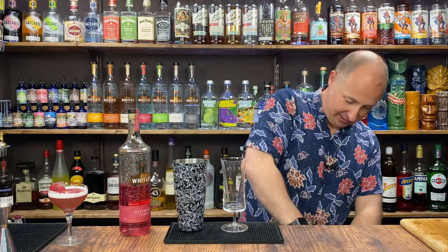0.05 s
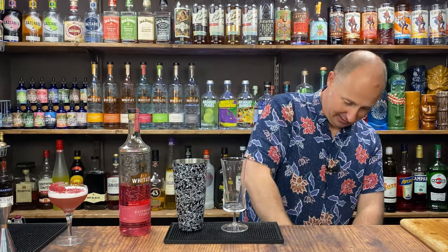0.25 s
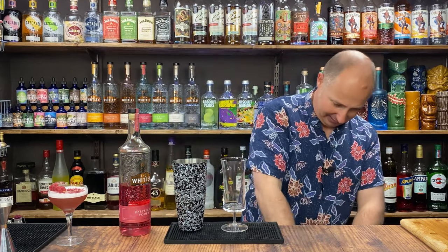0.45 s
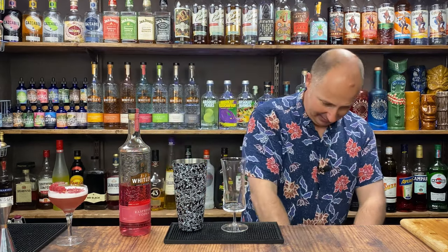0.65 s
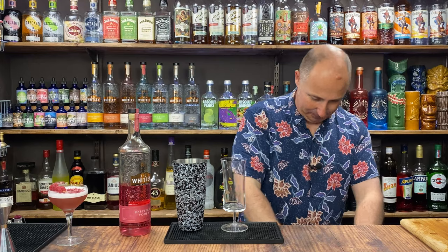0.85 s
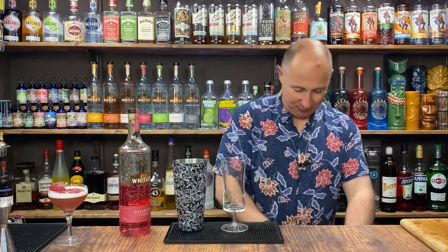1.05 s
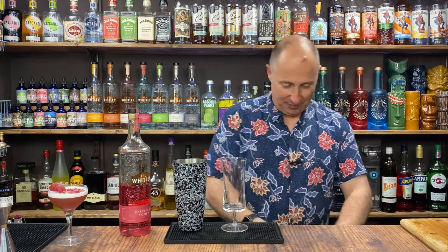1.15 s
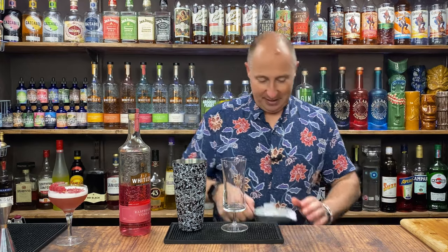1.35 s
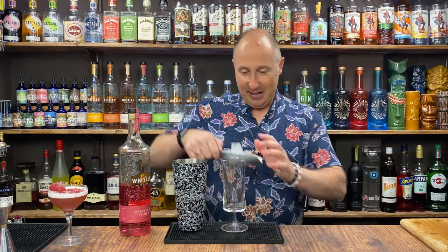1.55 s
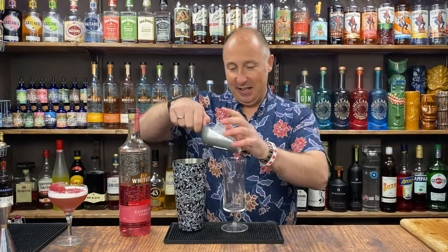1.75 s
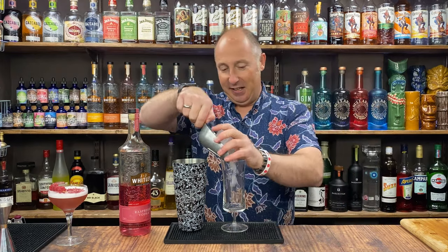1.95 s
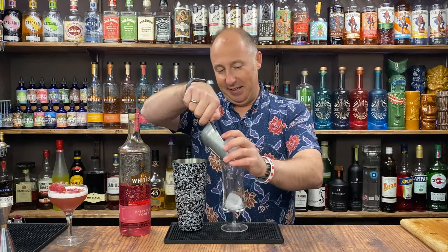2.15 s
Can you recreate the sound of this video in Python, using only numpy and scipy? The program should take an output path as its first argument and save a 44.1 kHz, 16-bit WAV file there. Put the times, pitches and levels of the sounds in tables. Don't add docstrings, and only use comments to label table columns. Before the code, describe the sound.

Ice rattles loudly as a metal scoop digs in a bin, then cubes clink in a glass

```python
import sys
import numpy as np
from scipy import signal
from scipy.fft import rfft, irfft
from scipy.io import wavfile
from scipy.ndimage import uniform_filter1d

SR = 44100
rng = np.random.default_rng(int(sys.argv[2]) if len(sys.argv) > 2 else 0)


def wav_record(signal):
    frames = np.transpose(np.atleast_2d(signal))
    bounded = np.clip(frames, -1, 1)
    quanta = np.round(bounded * 32767).astype(np.int16)
    wavfile.write(sys.argv[1], SR, quanta)


def volts_from_db(level):
    exponent = np.asarray(level, float) / 20
    return 10 ** exponent


N = 96931

# frequency [Hz], level [dB per Hz].
HUSH_SPECTRUM = [(25, -22), (60, -4), (125, -3), (310, 0), (800, -8), (4000, -14), (8000, -16),
                 (16000, -22)]
HUSH_DB = -72
HUM_HZ, HUM_WIDTH_HZ, HUM_DB = 57, 7, -72
ROOM_T60_S, ROOM_DB = 0.35, -21
SOFT_S = 0.00036

# start [s], low ring [dB], high ring [dB], air [dB], cube clack [dB].
GLASS_TAPS = [(1.929, -34.5, -38.5, -43, -35), (1.935, -37, -41, -49, -52), (1.943, -46, -45.5, -44, -34),
              (1.97, -52, -48, -53.5, -58), (1.992, -30.5, -30.5, -30, -23),
              (2.003, -29.5, -30.5, -38, -54), (2.024, -41, -39, -40, -39), (2.101, -67, -49, -50, -54),
              (2.126, -51, -44, -49, -48), (2.135, -38.5, -33.5, -25.5, -16.5),
              (2.154, -41.5, -35.5, -66, -55), (2.181, -49, -44.5, -41.5, -38)]
# falls from [s], air column [Hz], cube pitch [Hz].
DROPPED_CUBES = [
    (1.9, 559, 1480),
    (1.98, 522, 1392),
    (2.09, 580, 1477),
]
# frequency [Hz], level [dB], T60 [s].
WALL_LOW_MODES = [(1843, 7.5, 0.17), (1760, -32, 0.17), (2300, -12.5, 0.24)]
# frequency [Hz], level under first, second, third cube [dB],
# T60 [s].
WALL_HIGH_MODES = [(3210, -16, -15, -25.5, 0.32), (4359, -7.5, -8, -11, 0.17), (4716, -30, -34, -11, 0.16),
                   (5000, -15, -10, -19, 0.071), (5630, -5, -0.5, -17, 0.046), (7200, -5, 2.5, -2, 0.035),
                   (7910, -0.5, 2.5, -3, 0.081), (8250, -1, -4, -11, .05), (9300, -11, -1, 1, 0.02),
                   (9530, -10, -6, -8, 0.34), (9640, -13, -12, -12, 0.08), (10300, -7, -3, -6, 0.05),
                   (11790, -8, -7, -7, 0.071), (12620, -20, -24, -8.5, 0.055)]
# frequency [Hz], level [dB per Hz].
TICK_SPECTRUM = [(700, 2.5), (2300, -3), (16000, -4.5)]
# start [s], frequency [Hz], level [dB], T60 [s].
GLASS_NICKS = [
    (1.944, 8400, -39, 0.027),
    (1.988, 8950, -42, 0.035),
    (2.07, 9000, -43, 0.034),
    (2.094, 1900, -52, .04),
    (2.101, 2240, -40, 0.025),
    (2.102, 7000, -48, .04),
    (2.101, 4716, -54, 0.15),
    (2.181, 7350, -38, .04),
]
# start [s], level [dB].
CUBE_SHIFTS = [
    (1.805, -42.5),
    (1.809, -63.5),
    (1.821, -50),
    (1.836, -49),
    (1.85, -48),
    (1.860, -41),
    (1.891, -53),
    (1.906, -48),
]
# frequency [Hz], level [dB], T60 [s].
LOADED_SCOOP_MODES = [(1400, 0, .014), (1900, -2, .014), (2250, -7, .012), (3300, -6, .022),
                      (4150, -15, .015), (5800, -10, .03), (7100, -14, .025)]
AIR_T60_S, TAP_CUBE_T60_S = 0.094, 0.047
SPOT_DB, TICK_DB, TICK_T60_S = 1.5, 2.5, 0.087
SHIMMER_DB, SHIMMER_T60_S = -16, 0.04
WALL_SPLIT, TWIN_DB, FLUTTER = 0.005, -4, 0.45
DAMP_DB, DAMP_S = -24, 0.0021
BAR_HZ, BAR_DB, BAR_T60_S = 119, -14, 0.16

# start [s], clack [dB], bin thud [dB], crackle [dB], cube pitch [Hz].
DIG_KNOCKS = [(0.0014, -12.5, -33, -24, 1600), (0.0155, -7.5, -29, -20.5, 1725),
              (0.0404, -14.5, -30, -30.5, 1710), (0.0881, -13, -34.5, -52, 1586),
              (0.1114, -11, -21, -38, 1686), (0.1195, -17, -35, -30.5, 1814),
              (0.1433, -17, -27.5, -29, 1770), (0.163, -11, -25, -21, 1890), (0.186, -7.5, -31, -19, 1550),
              (0.1957, -17, -23, -29, 1690), (0.2276, -11.5, -28, -30.5, 1610),
              (0.2431, -10, -22, -26, 2090), (0.2581, -13, -33, -42, 1640), (0.2943, -16, -24, -30, 1600),
              (0.3135, -8.5, -21.5, -24, 1436), (0.3383, -13, -32, -29.5, 1576),
              (0.3787, -11, -27.5, -27, 2000), (0.407, -12, -28, -26, 1710), (0.4203, -9, -23, -29, 1760),
              (0.477, -12, -22, -29.5, 1723), (0.5441, -20, -45.5, -36.5, 2090),
              (0.5725, -33, -45.5, -35, 2090), (0.611, -23, -34, -32.5, 1290),
              (0.625, -13, -29, -24.5, 1206), (0.6391, -12, -34.5, -40, 1610),
              (0.6855, -16, -30.5, -42, 1615), (0.6977, -24.5, -51, -36.5, 2320),
              (0.7329, -18.5, -37, -46, 1300), (0.7602, -20.5, -36, -39, 2120),
              (0.7777, -20, -32.5, -41, 1730), (0.7876, -17.5, -44.5, -40, 1750)]
# start [s], clack [dB], bin thud [dB], crackle [dB],
# cube pitch [Hz].
LIFT_KNOCKS = [(0.8247, -29, -33, -43.5, 1800), (0.834, -16, -38, -29.5, 2067),
               (0.8529, -23.5, -40, -33.5, 1460), (0.8715, -22, -30, -36, 1470),
               (0.8936, -22.5, -32.5, -47, 1700), (0.9087, -27, -34, -39, 1470),
               (0.9607, -26, -37.5, -53, 1405), (0.9596, -32, -35.5, -36.5, 1580),
               (1.0243, -43, -41, -45.5, 1540), (1.0704, -31, -58, -53.5, 2410),
               (1.0863, -27.5, -42, -42, 1960), (1.1221, -16, -27.5, -30.5, 1370),
               (1.1445, -16.5, -40, -40, 1353), (1.1525, -15.5, -47, -34.5, 1967),
               (1.162, -22.5, -43.5, -32.5, 1860), (1.1704, -20, -36, -37, 1943),
               (1.1894, -23.5, -33, -38, 1330), (1.2209, -20.5, -30.5, -43.5, 2234),
               (1.253, -26, -35.5, -47.5, 2400), (1.2741, -26.5, -48.5, -41.5, 1395),
               (1.283, -30.5, -49, -43, 1970), (1.3124, -46, -53, -55, 1930)]
# start [s], clack [dB], bin thud [dB], crackle [dB],
# cube pitch [Hz].
EXTRA_KNOCKS = [
    (0.950, -30, -50, -31, 1600),
    (1.352, -50, -65, -62, 1900),
    (0.626, -17, -40, -45, 850),
    (0.188, -10, -34, -24, 2000),
    (0.308, -15, -30, -36, 1050),
    (0.700, -26, -45, -50, 800),
    (1.418, -80, -95, -68, 1900),
]
# time [s], rattle [dB], push on the bin [dB re rattle],
# grinding [dB re rattle].
STIRRING = [
    (0, -30.5, -3.5, 3),
    (0.069, -31, -7.5, -0.5),
    (.29, -26.5, -2.5, 1.5),
    (.53, -32.5, -3.5, 0),
    (.79, -41.5, -11.5, -2),
    (.93, -38, -8, -2.5),
    (1.16, -53.5, 0.5, 3.5),
    (1.3, -52.5, -8.5, 2),
    (1.38, -47, -9.5, -3),
]
# frequency [Hz], level [dB], T60 [s].
BIN_MODES = [(152, -17, 0.081), (211, -9, 0.056), (327.2, -5, 0.18), (406, 8.5, 0.031), (516, 3.5, .06),
             (630, 10.5, 0.019), (850, -8.5, 0.055)]
# frequency [Hz], level [dB per Hz].
CRACKLE_SPECTRUM = [(1470, -36), (2500, -3.5), (4440, -12), (5830, -10), (9290, -14), (11000, -11.5),
                    (14100, -20.5), (16000, -32)]
# frequency [Hz], level [dB], T60 [s].
SCOOP_MODES = [(989.7, 0, 0.13)]
# start [s], level [dB].
FREE_SCOOP_BLOWS = [
    (1.086, -37),
    (1.124, -28.5),
    (1.158, -27),
    (1.170, -25),
    (1.192, -27.5),
    (1.222, -26.5),
    (1.254, -30.5),
    (1.279, -36),
    (1.311, -41),
]
CUBE_HZ, CUBE_SPREAD, KNOCK_SPREAD, CUBE_T60_S = 1721, 0.33, 0.25, 0.02
CUBE_LOW_HZ, CUBE_TOP_HZ = 1150, 2645
BIN_DETUNE = 0.077
CRACKLE_T60_S, CHIP_DB, CHIP_T60_S = 0.025, -13, 0.022
CLACK_DB, THUD_DB, CRACKLE_DB = -2.5, 3.5, 12.5
NEAR_T60_S, NEAR_DB = 0.073, 2
TUMBLES_PER_S, GRINDS_PER_S, GRAIN_SPREAD_DB = 700, 2500, 4.0
STIR_END_S, STIR_FADE_S = 1.33, 0.22
REBOUNDS_S, DIG_REBOUND_DB, LIFT_REBOUND_DB, FIRST_BLOW_DB = 0.012, -6.5, -8.0, -1.5
SCOOP_DB, FREE_SCOOP_S, FREE_T60_S = -25, 1.08, 0.089
GRIP_S, GRIP_T60_S = 1.355, 0.04
MIC_LOW_HZ, EDGE_HZ = 140, 16100


def evened(x):
    return x / np.sqrt(np.mean(x ** 2) + 1e-20)


def unit(x):
    return x / np.linalg.norm(x)


def signs(count):
    return rng.choice([-1., 1.], count)


def add(mix, start_s, sound):
    part = mix[int(round(start_s * SR)):][:len(sound)]
    part += sound[:len(part)]


def coloured(x, points):
    f, db = np.transpose(points)
    hz = np.fft.rfftfreq(len(x), 1 / SR) + 1
    gain = volts_from_db(np.interp(np.log(hz), np.log(f), db)) * np.minimum(hz / f[0], 1) ** 2
    return irfft(rfft(x) * gain, len(x))


def ring(modes, size=6000):
    t = np.arange(size) / SR
    sines = sum(volts_from_db(db - 60 * t / max(t60, 1e-3)) * np.sin(2 * np.pi * hz * t) for hz, db, t60 in modes)
    return (1 - np.exp(-t / SOFT_S)) * sines


def puff(t60_s, size=3000):
    return rng.standard_normal(size) * volts_from_db(-60 * np.arange(size) / SR / max(t60_s, 1e-3))


def hush():
    r = np.exp(-np.pi * HUM_WIDTH_HZ / SR)
    noise = rng.standard_normal(N) + 1j * rng.standard_normal(N)
    slow = signal.lfilter([1 - r], [1, -r], noise)
    carrier = np.exp(2j * np.pi * HUM_HZ * np.arange(N) / SR)
    hum = ((np.abs(slow).mean() + slow) * carrier).real
    air = coloured(rng.standard_normal(N), HUSH_SPECTRUM)
    return volts_from_db(HUSH_DB) * evened(air) + volts_from_db(HUM_DB) * evened(hum)


def space(x, t60_s):
    echoes = np.zeros(SR // 2)
    at = np.arange(100, SR // 2 - 20, 20)
    echoes[at + rng.integers(0, 20, len(at))] = signs(len(at))
    echoes *= volts_from_db(-60 * np.arange(len(echoes)) / SR / t60_s)
    return signal.fftconvolve(x, unit(echoes))[:N]


def scoop_shift():
    modes = [(hz * rng.uniform(0.96, 1.03), db, t60) for hz, db, t60 in LOADED_SCOOP_MODES]
    scrape = signal.fftconvolve(ring(modes), unit(puff(0.052)))[:3000]
    return scrape + volts_from_db(-9.5) * coloured(puff(0.073), TICK_SPECTRUM)


def wall_modes(low_db, high_db, cube, luck):
    low = [(hz, db + low_db, t60) for hz, db, t60 in WALL_LOW_MODES]
    high = [(row[0], row[1 + cube] + high_db + SPOT_DB * x, row[4])
            for row, x in zip(WALL_HIGH_MODES, luck)]
    low += [(hz * (1 + 3 * WALL_SPLIT), db + 2 * TWIN_DB, t60) for hz, db, t60 in low]
    high += [(hz * (1 + WALL_SPLIT * x), db + TWIN_DB, t60 / 2)
             for (hz, db, t60), x in zip(high, luck[::-1])]
    high += [(hz, high_db + SHIMMER_DB, SHIMMER_T60_S) for hz in rng.uniform(2200, 15000, 40)]
    return low, high


def glass_tap(tap, next_s, size=9000):
    start_s, low_db, high_db, air_db, cube_db = tap
    cube = sum(row[0] <= start_s for row in DROPPED_CUBES) - 1
    _, air_hz, cube_hz = DROPPED_CUBES[cube]
    low, high = wall_modes(low_db, high_db, cube, rng.standard_normal(20))
    touched = np.clip((np.arange(size) / SR - next_s + start_s) / DAMP_S, 0, 1)
    flutter = 1 + FLUTTER * evened(uniform_filter1d(rng.standard_normal(size), size=120))
    sound = ring(low, size) * volts_from_db(DAMP_DB * touched)
    sound += ring(high, size) * flutter * volts_from_db(0.8 * DAMP_DB * touched)
    sound += ring([(air_hz, air_db, AIR_T60_S), (cube_hz, cube_db, TAP_CUBE_T60_S),
                   (BAR_HZ, air_db + BAR_DB, BAR_T60_S)], size)
    add(sound, 0, volts_from_db(high_db + TICK_DB) * coloured(puff(TICK_T60_S), TICK_SPECTRUM))
    return sound


def glass():
    out = np.zeros(N)
    for tap, (next_s, *_) in zip(GLASS_TAPS, GLASS_TAPS[1:] + [(9,)]):
        add(out, tap[0], glass_tap(tap, next_s))
    for start_s, hz, db, t60 in GLASS_NICKS:
        add(out, start_s, ring([(hz, db, t60), (hz * 1.03, db - 5, t60 / 2)]))
    for start_s, db in CUBE_SHIFTS:
        add(out, start_s, volts_from_db(db) * scoop_shift())
    return out


def walled(x):
    return x + volts_from_db(NEAR_DB) * signal.fftconvolve(x, unit(puff(NEAR_T60_S)))[:len(x)]


def struck(pitch_hz, spread, size=4000):
    hz = pitch_hz * np.exp(spread * rng.standard_normal(9) * (np.arange(9) > 0))
    cube_db = -8 * ((hz > CUBE_TOP_HZ) | (hz < CUBE_LOW_HZ))
    cube = ring(zip(hz, cube_db, CUBE_T60_S * (0.5 + rng.random(9))), size)
    spot = ring([(f * (1 + BIN_DETUNE * rng.standard_normal()), db, t60) for f, db, t60 in BIN_MODES], size)
    chips = ring([(f, 0, CHIP_T60_S) for f in rng.uniform(3000, 14000, 3)], size=3000)
    frost = unit(puff(CRACKLE_T60_S)) + volts_from_db(CHIP_DB) * unit(chips) + volts_from_db(-5.5) * unit(puff(0.0016))
    return [unit(walled(x)) for x in (cube, spot, frost)]


def tumble():
    s, db, push_db, grind_db = np.transpose(STIRRING)
    t = np.arange(N) / SR
    base_db = np.interp(t, s, db) - 60 * np.maximum(t - STIR_END_S, 0) / STIR_FADE_S
    parts = [(0 * db, TUMBLES_PER_S), (push_db, TUMBLES_PER_S), (grind_db, GRINDS_PER_S)]
    trains = np.zeros((3, N))
    for train, (rel_db, rate) in zip(trains, parts):
        size_db = GRAIN_SPREAD_DB * np.minimum(rng.exponential(1, N), 4)
        blows = volts_from_db(size_db) * (rng.random(N) < rate / SR)
        train[:] = evened(blows) * signs(N) * volts_from_db(base_db + np.interp(t, s, rel_db))
    return trains


def rebounds(digging, count=6):
    late = np.arange(count) + rng.random(count) * (np.arange(count) > 0)
    fade_db = DIG_REBOUND_DB if digging else LIFT_REBOUND_DB
    train = np.zeros(4000)
    at = (late * REBOUNDS_S / 2 * SR).astype(int)
    train[at] = 10 * np.sign(np.sin(40 * late + 1)) * volts_from_db(fade_db * late)
    train[0] *= volts_from_db(FIRST_BLOW_DB * digging)
    return train


def scoop_ring(blows):
    buried = np.arange(N) / SR <= FREE_SCOOP_S
    out = 2 * volts_from_db(SCOOP_DB) * signal.oaconvolve(blows * buried, unit(ring(SCOOP_MODES, size=9000)))[:N]
    for (start_s, db), (next_s, _) in zip(FREE_SCOOP_BLOWS, FREE_SCOOP_BLOWS[1:] + [(GRIP_S, 0)]):
        late_s = np.maximum(np.arange(6000) / SR - next_s + start_s, 0)
        free = ring([(SCOOP_MODES[0][0], db, FREE_T60_S)])
        add(out, start_s, volts_from_db(-60 * late_s / GRIP_T60_S) * free)
    return out


def ice(count=32):
    trains, out = tumble(), np.zeros((3, N))
    which, blows = rng.integers(0, count, N), trains[0].copy()
    for k in range(count):
        for row, train, sound in zip(out, trains, struck(CUBE_HZ, CUBE_SPREAD)):
            add(row, 0, signal.oaconvolve(train * (which == k), sound))
    for start_s, db, thud_db, crackle_db, hz in DIG_KNOCKS + LIFT_KNOCKS + EXTRA_KNOCKS:
        train = rebounds(start_s < LIFT_KNOCKS[0][0])
        add(blows, start_s, volts_from_db(db + CLACK_DB) * train)
        levels_db = [db + CLACK_DB, thud_db + THUD_DB, crackle_db + CRACKLE_DB]
        for row, level_db, sound in zip(out, levels_db, struck(hz, KNOCK_SPREAD)):
            add(row, start_s, volts_from_db(level_db) * signal.fftconvolve(train, sound))
    clack, thud, crackle = out
    return clack + thud + 2 * coloured(crackle, CRACKLE_SPECTRUM) + scoop_ring(blows)


def scene():
    cubes, clinks = ice(), glass()
    near = cubes + clinks + volts_from_db(-10.5) * space(clinks, 0.054)
    near = signal.sosfilt(signal.butter(3, MIC_LOW_HZ, "high", fs=SR, output="sos"), near)
    return (near + volts_from_db(ROOM_DB) * space(near, ROOM_T60_S) + hush())[None]


def top_cut(x):
    return signal.sosfilt(signal.butter(12, 16520, fs=SR, output="sos"), x)


def record(dry):
    kept = signal.oaconvolve(dry, signal.firwin(255, EDGE_HZ, fs=SR)[None], "same")
    return top_cut(kept)


dry = scene()
out = record(dry)
wav_record(out)
```